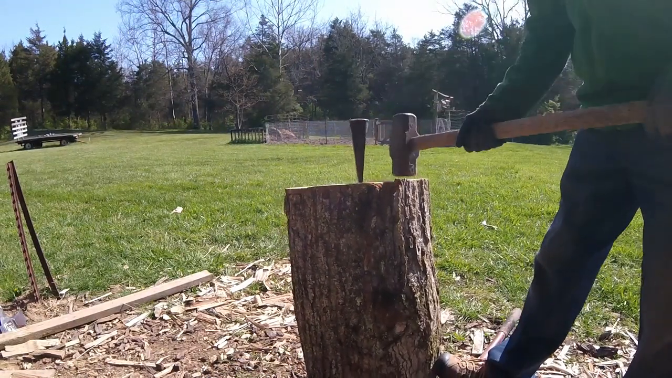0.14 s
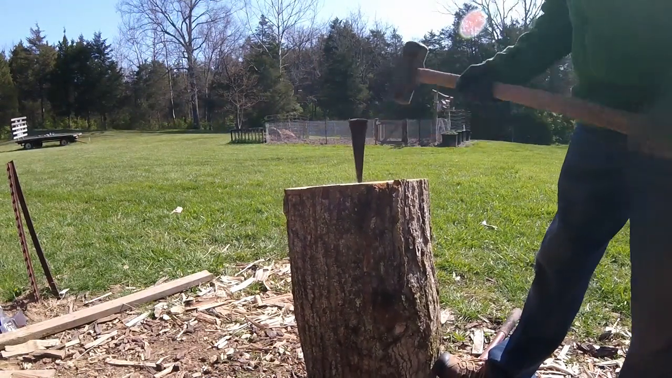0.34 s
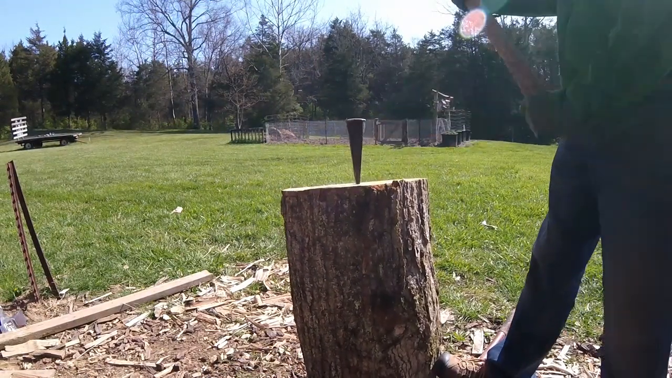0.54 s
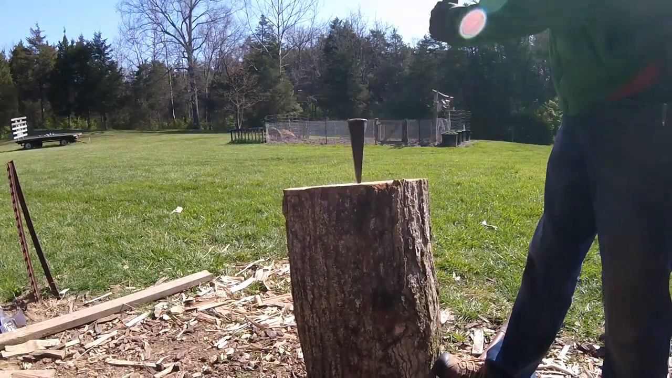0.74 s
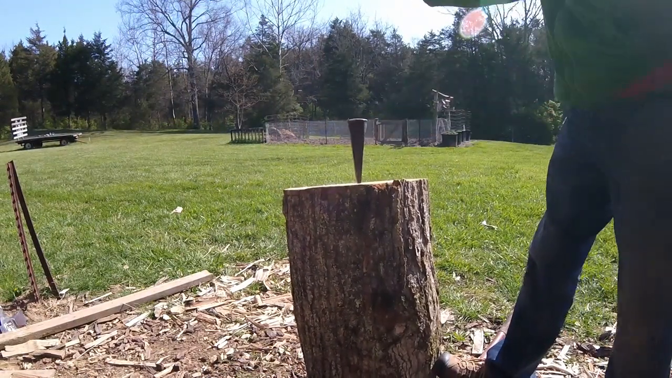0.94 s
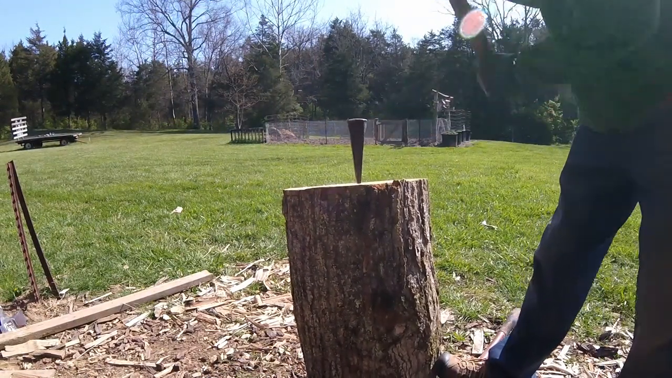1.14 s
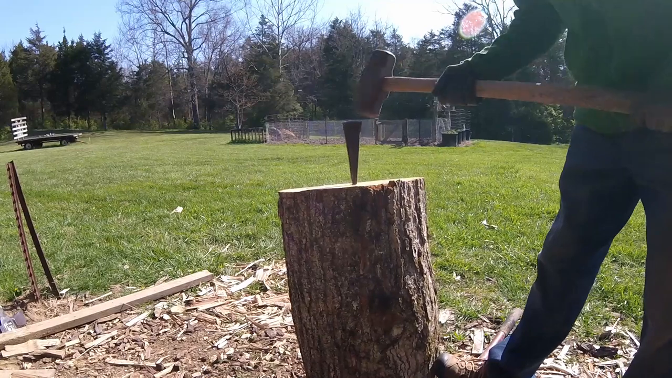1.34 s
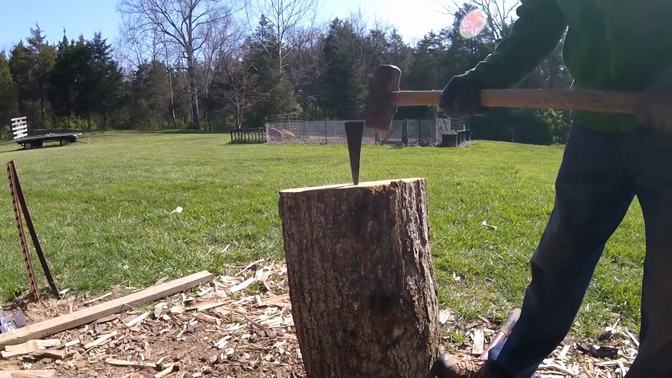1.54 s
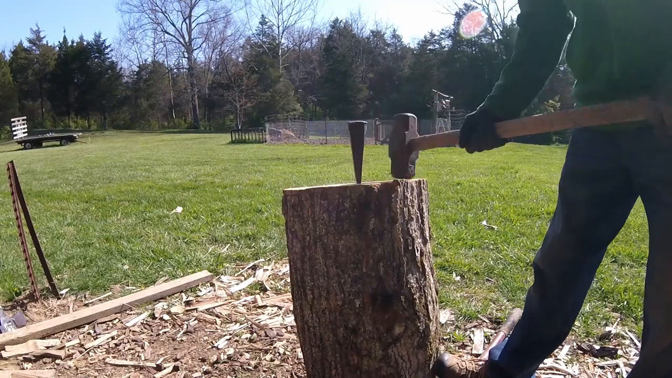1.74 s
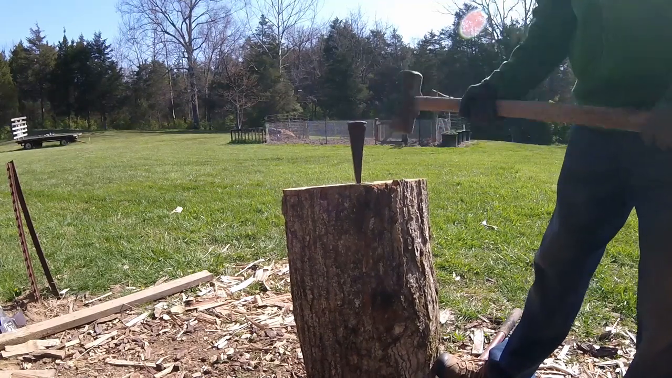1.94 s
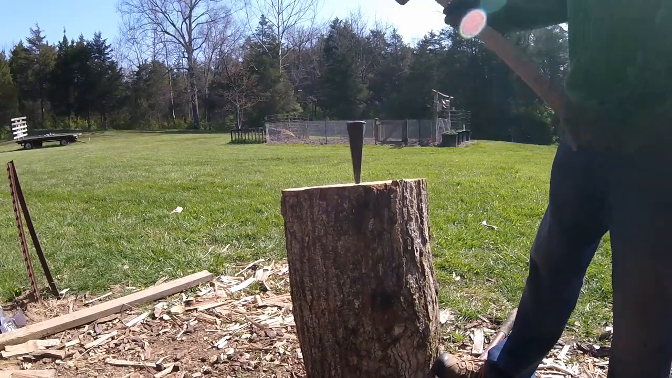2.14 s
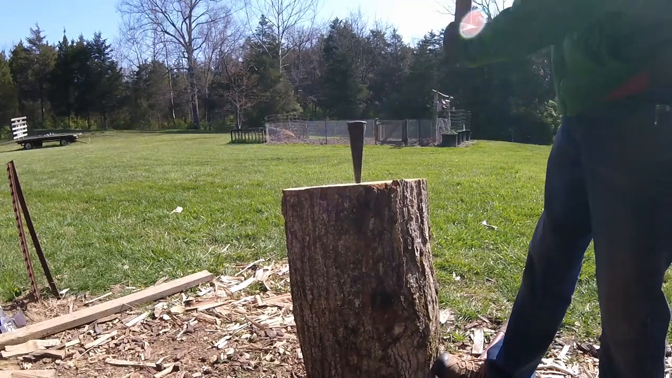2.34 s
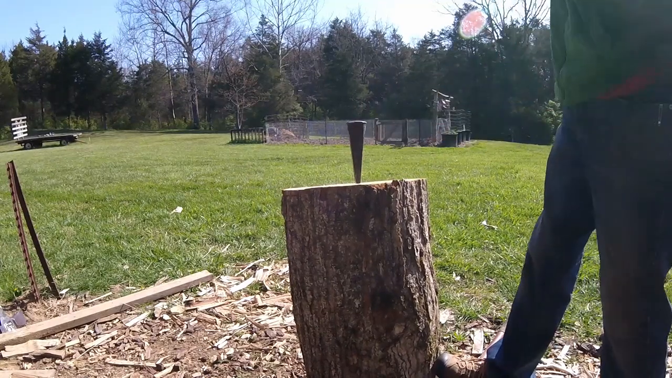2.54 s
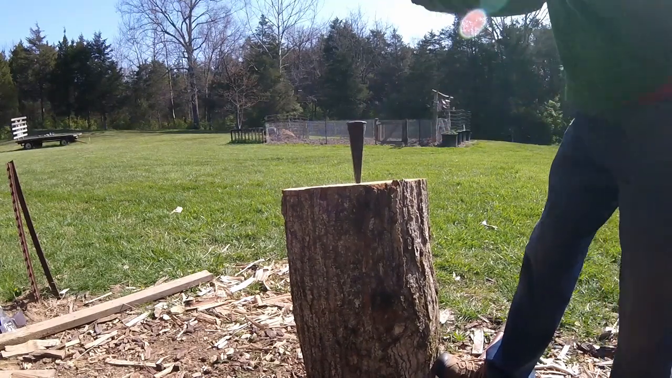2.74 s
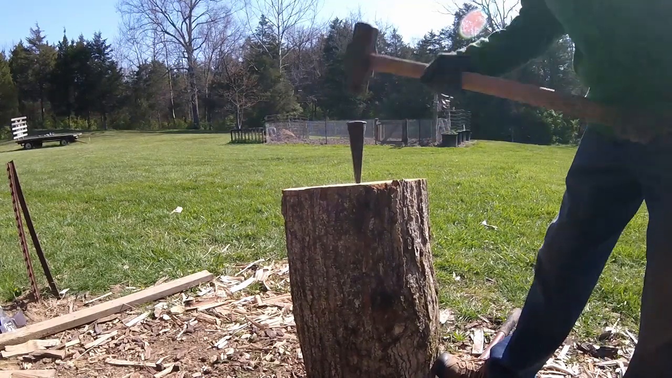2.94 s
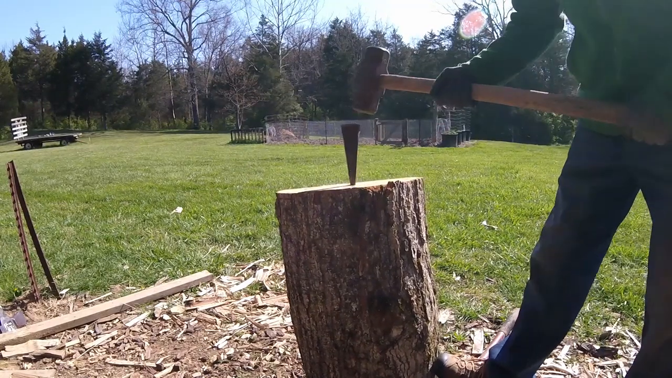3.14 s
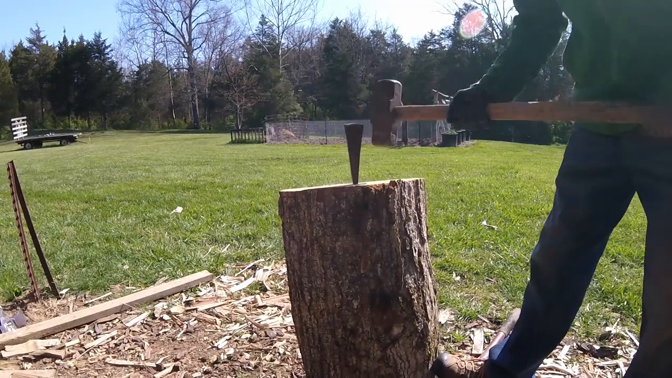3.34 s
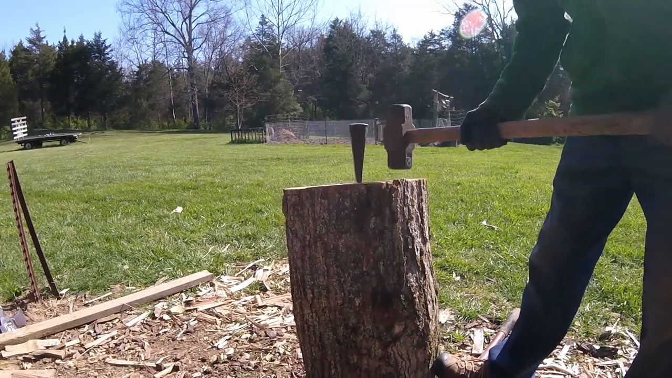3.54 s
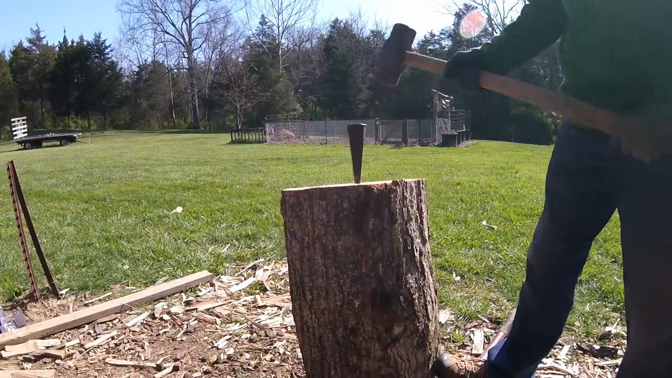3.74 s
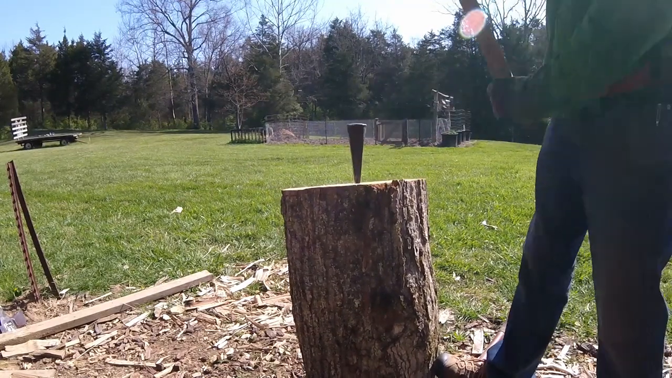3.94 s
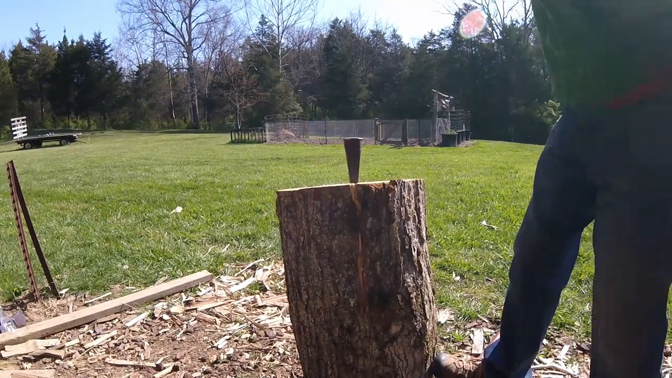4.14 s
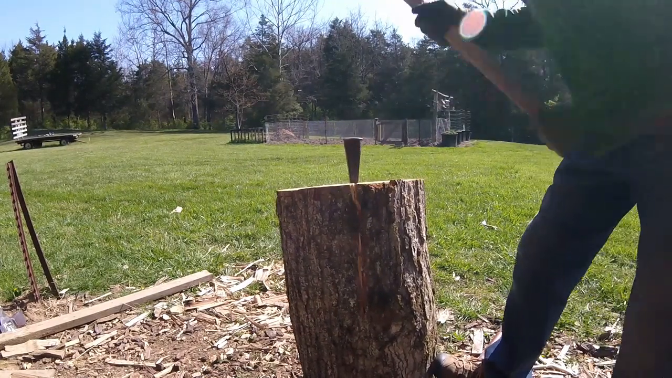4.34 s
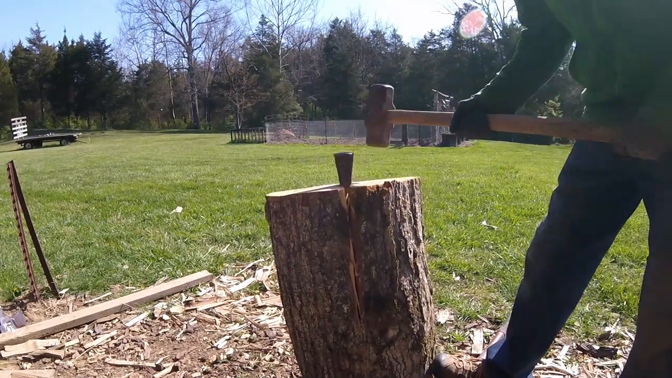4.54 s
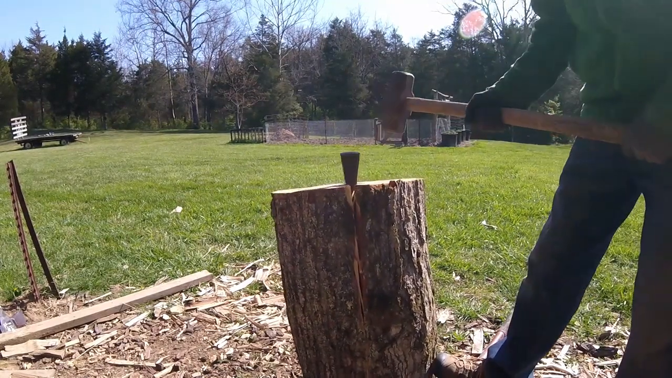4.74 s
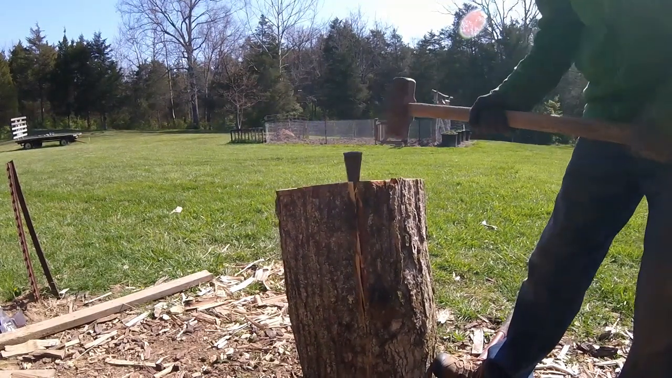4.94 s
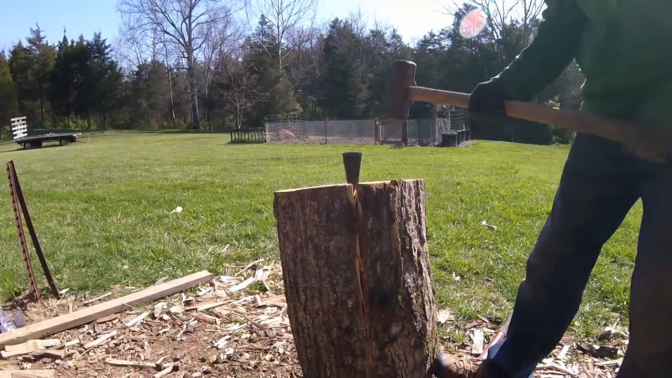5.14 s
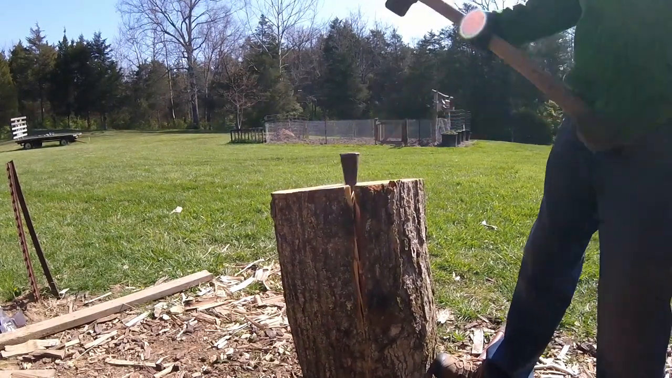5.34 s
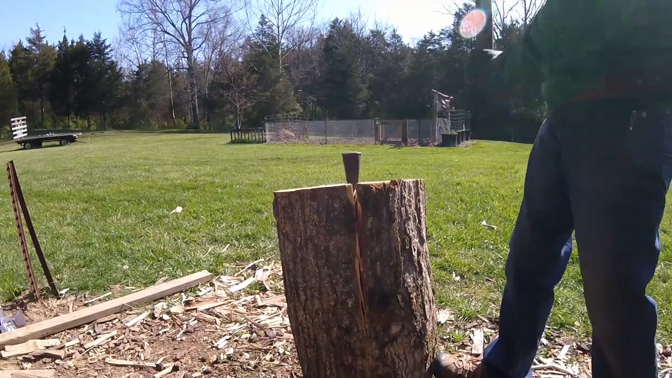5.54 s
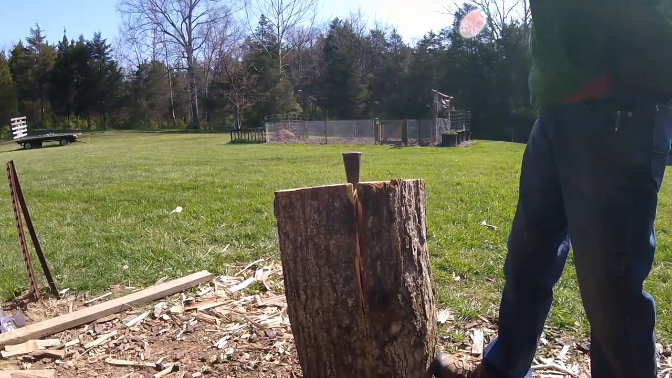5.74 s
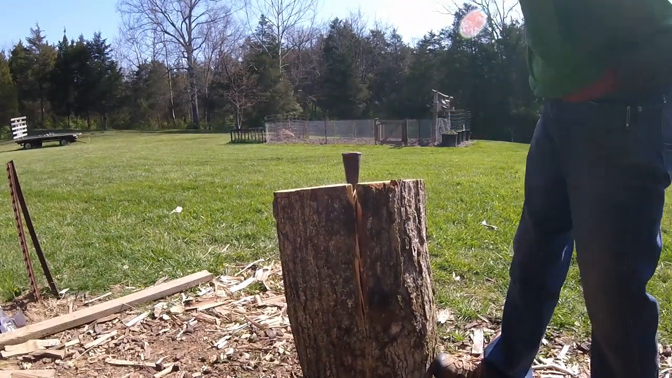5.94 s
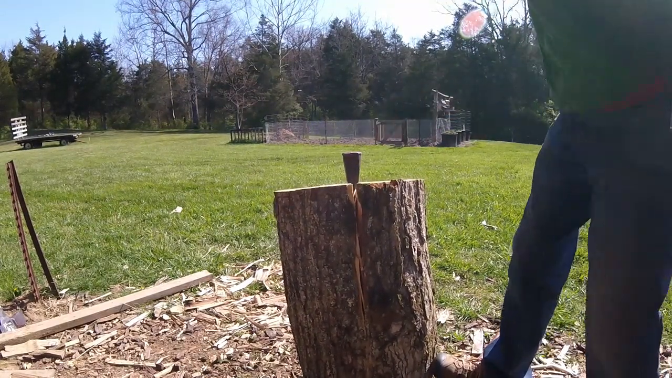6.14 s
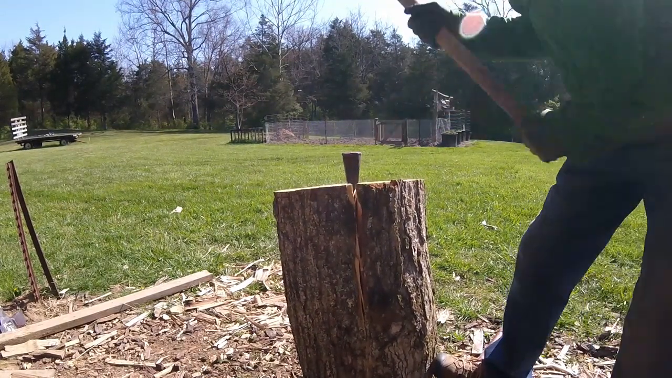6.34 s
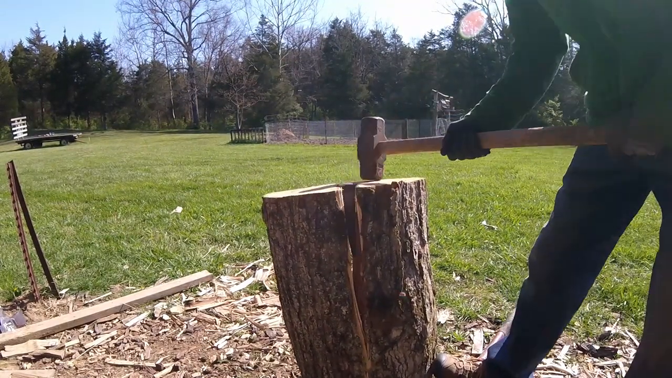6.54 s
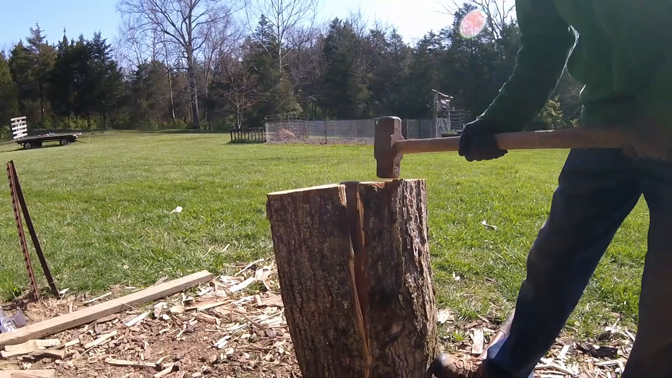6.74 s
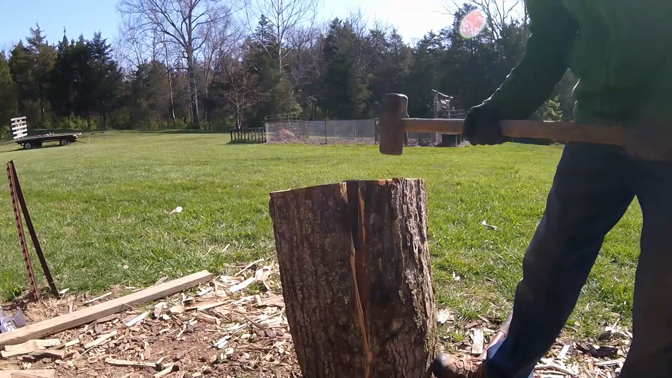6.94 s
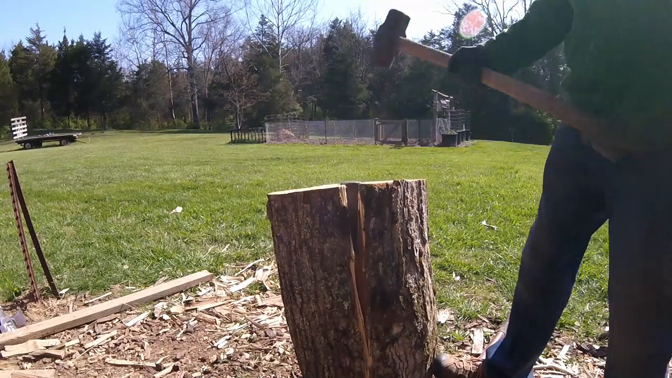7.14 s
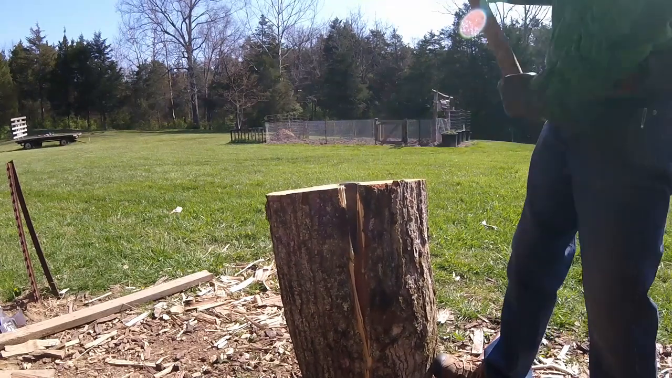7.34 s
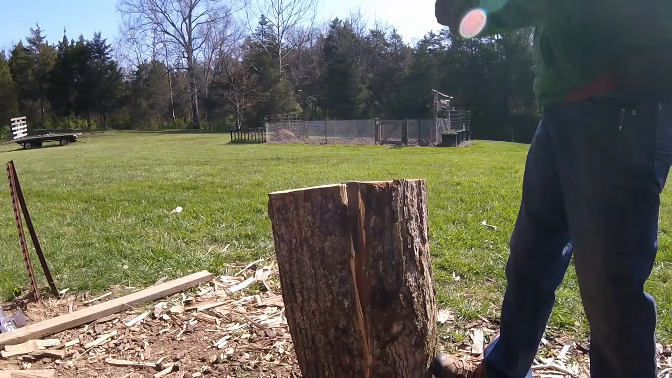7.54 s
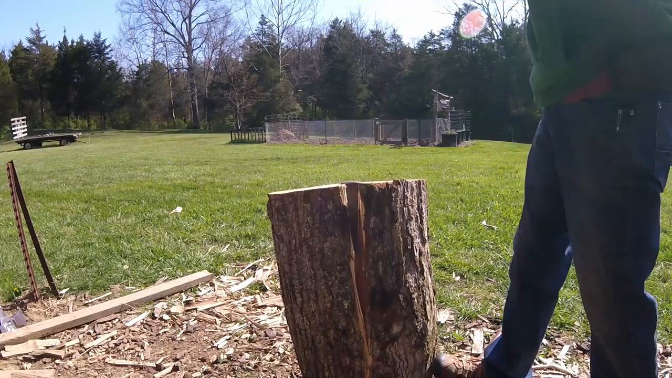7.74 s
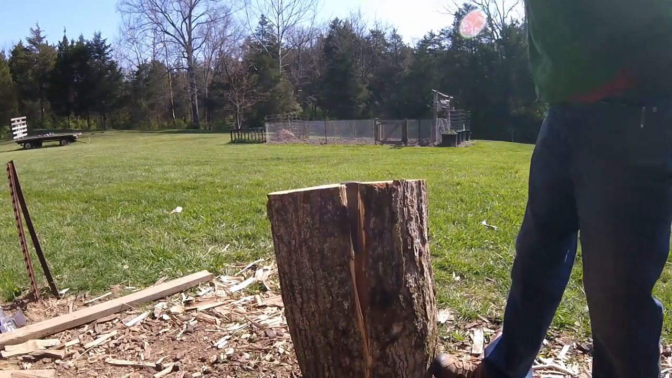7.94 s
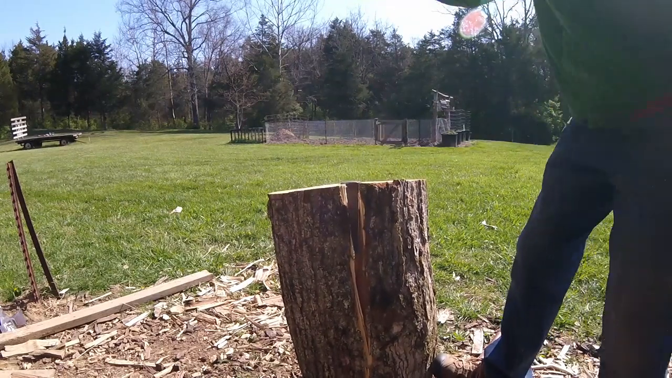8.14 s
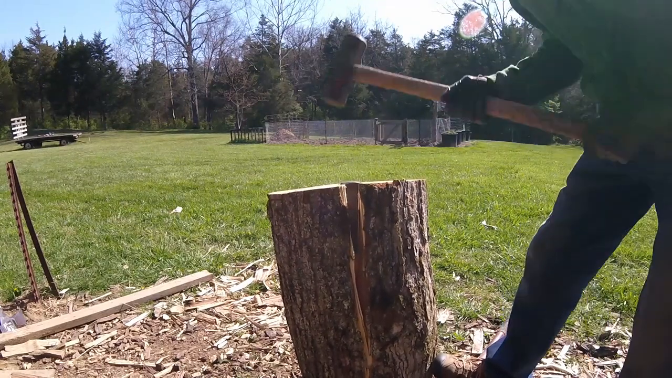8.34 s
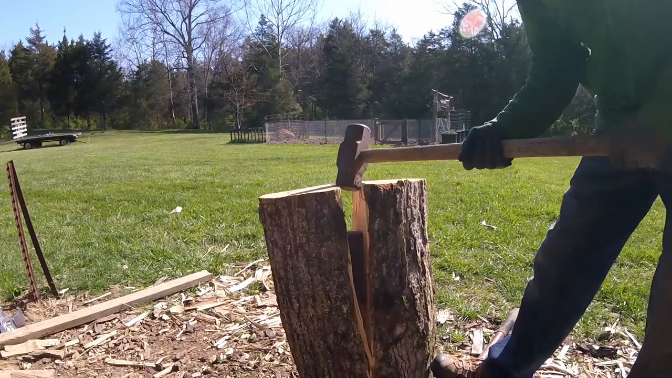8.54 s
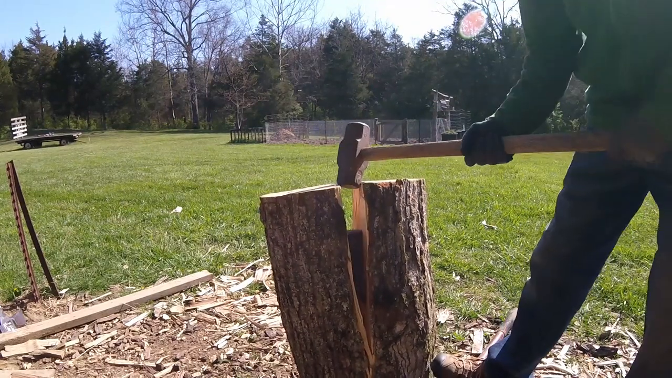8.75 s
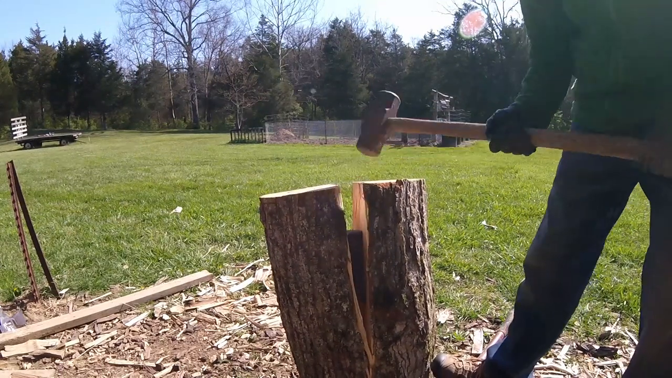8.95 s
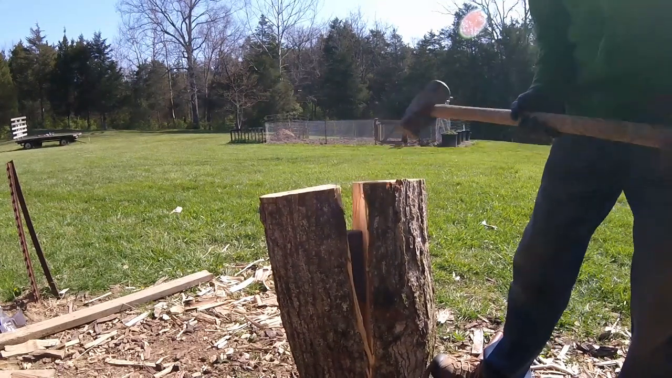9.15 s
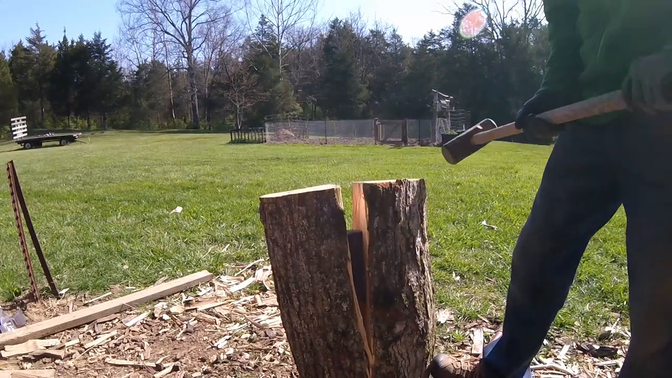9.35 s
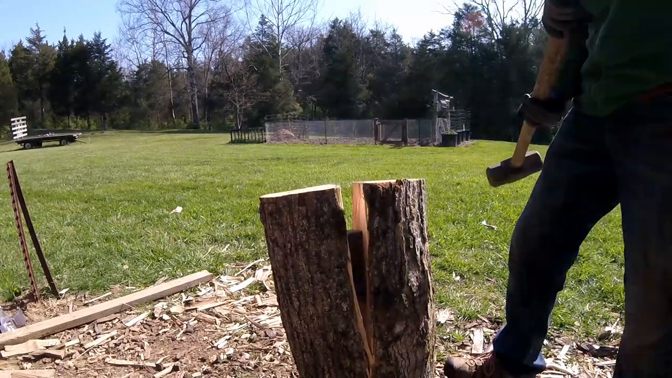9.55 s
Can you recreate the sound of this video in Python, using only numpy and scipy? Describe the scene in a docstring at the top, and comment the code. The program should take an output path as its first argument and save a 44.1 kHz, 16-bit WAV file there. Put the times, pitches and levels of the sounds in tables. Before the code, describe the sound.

Close by in a quiet yard, a heavy hammer knocks lightly on a log, then clanks twice against a steel wedge. Three more blows ring out as the wedge sinks and the wood rips, with small clicks and ticks in the pauses. The last strike splits the log and leaves the loosened wedge ringing briefly. Behind it are a soft rumble of open air and two very faint, distant bird notes.

```python
"""A sledgehammer drives a steel wedge into a log on a quiet lawn, five blows in all.
Each impact excites the modes of steel and wood: the wedge clanks while it stands tall, then rings
as it sinks and the log tears open. Between blows the hammer clicks and is set down; strained fibres tick.
Yard and tree line reflect the sound, over a low rumble of open air and two far bird notes.
A look-ahead limiter lowers the gain just before each blow."""
import sys
import numpy as np
from scipy import signal
from scipy.fft import rfft, irfft
from scipy.io import wavfile
from scipy.ndimage import uniform_filter1d, minimum_filter1d

SR = 44100
rng = np.random.default_rng(int(sys.argv[2]) if len(sys.argv) > 2 else 0)


def log_audio(samples):
    """Write samples as a 16-bit WAV file to the path given in sys.argv[1]."""
    # one column per channel
    frames = np.atleast_2d(samples).T
    # limit to full scale, then quantise
    limited = np.clip(frames, -1, 1)
    pcm = np.round(limited * 32767).astype(np.int16)
    wavfile.write(sys.argv[1], SR, pcm)


N = 426888


def amp(db):
    """Amplitude ratio of a level in decibels."""
    return 10 ** (np.asarray(db) / 20)


def unit(x):
    """Normalisation to rms 1."""
    return x / np.sqrt(np.mean(x ** 2) + 1e-20)


def clock(seconds):
    """Sample times from zero."""
    return np.arange(int(seconds * SR)) / SR


def add(mix, s, sound):
    """Superposition: a sound joins the mix at time s."""
    part = mix[round(s * SR):][:len(sound)]
    part += sound[:len(part)]


def gains(spectrum, size):
    """Frequency response at the FFT bins, interpolated in log frequency."""
    hz, db = np.transpose(spectrum)
    return amp(np.interp(np.log(np.fft.rfftfreq(size, 1 / SR) + 1), np.log(hz), db))


def colour(x, spectrum):
    """Spectral shaping of x, at rms 1."""
    return unit(irfft(rfft(x) * gains(spectrum, len(x)), len(x)))


def noise(size, spectrum):
    """Gaussian noise of a given spectrum, at rms 1."""
    return colour(rng.standard_normal(size), spectrum)


def band_noise(size, hz, octaves):
    """Noise in a bell-shaped band around hz, at rms 1."""
    away = np.log2((np.fft.rfftfreq(size, 1 / SR) + 1) / hz) / octaves
    return unit(irfft(rfft(rng.standard_normal(size)) * np.exp(-.5 * away ** 2), size))


def burst(db, hz, octaves=.6, t60=.015):
    """A damped noise transient; the lower its band, the slower its rise."""
    t = clock(0.3)
    rise = 1 - np.exp(-2 * np.pi * hz * t)
    return amp(db - 60 * t / t60) * rise * band_noise(len(t), hz, octaves)


def ring(modes, t60_scale=1, grind=0):
    """Modal vibration: damped sines of alternating sign, their pitch briefly shaken by grinding."""
    t = clock(.5)
    shake = grind * np.exp(-t / 0.073) * band_noise(len(t), 120, 0.67)
    warped_t = np.cumsum(1 + shake) / SR
    return sum((-1) ** k * amp(db - 60 * t / (t60 * t60_scale)) * np.sin(2 * np.pi * hz * warped_t)
               for k, (hz, db, t60) in enumerate(modes))


# spectrum of the open air (frequency [Hz], relative level [dB])
AIR_SPECTRUM = [(12, -30), (20, 0.5), (43, 1.5), (198, -22.5), (594, -29.5), (1280, -32), (1650, -32),
                (2020, -33), (2410, -34.5), (2600, -33), (3820, -41.5), (4680, -43.5), (5890, -45.5),
                (6520, -41), (8850, -52), (11500, -80.5), (19500, -120)]
def air(rumble_db=-56.8, hiss_db=-83):
    """Ambient noise: a low broadband rumble and a narrow band of hiss."""
    return amp(rumble_db) * noise(N, AIR_SPECTRUM) + amp(hiss_db) * band_noise(N, hz=6550, octaves=.045)


# far notes (time [s], duration [s], start [Hz], end [Hz], level [dB], relative second harmonic [dB])
BIRD_NOTES = [(0.787, 0.133, 2350, 2390, -69.5, -7), (3.65, 0.22, 3540, 3370, -66, -30)]
def bird():
    """Frequency modulation: thin gliding tones that waver a little."""
    out = np.zeros(N)
    for s, length, start_hz, end_hz, db, second_db in BIRD_NOTES:
        t = clock(length)
        hz = np.linspace(start_hz, end_hz, len(t)) * (1 + 0.016 * band_noise(len(t), 60, 1))
        phase = 2 * np.pi * np.cumsum(hz) / SR
        tone = np.sin(phase) + amp(second_db) * np.sin(2 * phase)
        add(out, s, amp(db) * np.sin(np.pi * t / length) * tone)
    return out


# cloth brushing (time [s], duration [s], level [dB], centre [Hz])
CLOTH_BRUSHES = [(7.519, 0.14, -62.5, 2165)]
def sleeves():
    """Friction noise: clothes brush in a soft swell as the hammer is lifted."""
    out = np.zeros(N)
    for s, length, db, hz in CLOTH_BRUSHES:
        t = clock(length)
        add(out, s, amp(db) * np.sin(np.pi * t / length) * band_noise(len(t), hz, octaves=0.58))
    return out


# spectrum of the woods' echo (frequency [Hz], relative level [dB])
WOODS_SPECTRUM = [(200, -19.5), (800, -11.5), (1400, -1), (2000, 1.5), (2600, -1.5), (3500, -3.5),
                  (4400, -7), (5200, -9), (6200, -15.5), (8000, -22), (11000, -46.5)]
def tree_line(x, t60=0.99, rise_s=0.061):
    """Reverberation: the echo from the woods builds, holds a while, then falls ever faster."""
    t = clock(1.5)
    envelope = (1 - np.exp(-(t / rise_s) ** 2)) * amp(-60 * (t / t60) ** 1.5)
    response = noise(len(t), WOODS_SPECTRUM) * envelope
    return signal.fftconvolve(x, response / np.linalg.norm(response))[:N]


def lingering_echo(level_db=-52, t60=0.45):
    """Reverberant decay: at the start the woods still carry the echo of an earlier blow."""
    return noise(N, WOODS_SPECTRUM) * amp(level_db - 60 * np.arange(N) / SR / t60)


# what the yard returns of steel and of wood (frequency [Hz], relative level [dB])
STEEL_RETURN = [(150, -1.5), (600, -1.5), (1500, 3), (3500, -2.5), (6000, -4.5), (8500, -2), (10500, -12.5)]
WOOD_RETURN = [(150, -1), (450, -6.5), (900, 4), (1500, -2.5), (3000, -7.5), (8000, -2)]
def yard(x, scatter, delay_s=0.0021, knee_s=0.029):
    """Early reflections: log, ground and things nearby scatter sound, which dies faster past the knee."""
    t = clock(.5)
    decay_db = -120 * t - 300 * np.maximum(t - knee_s, 0)
    response = noise(len(t), scatter) * (t > delay_s) * amp(decay_db)
    return signal.fftconvolve(x, response / np.linalg.norm(response))[:N]


# spectrum of shaken soil (frequency [Hz], relative level [dB])
SOIL_SPECTRUM = [(15, -10.5), (40, 6.5), (70, -1), (120, -8.5), (200, -19.5), (400, -44), (1500, -79.5)]
def ground(t60=0.56, rock_back_s=0.13, rock_back_db=-10.5):
    """Ground-borne vibration: the soil shudders at each blow, and more weakly as the log rocks back."""
    out, t = np.zeros(N), clock(0.98)
    envelope = amp(-60 * t / t60) * (1 - np.exp(-t / .003))
    for s, *_, db in HAMMER_BLOWS:
        add(out, s, amp(db) * envelope * noise(len(t), SOIL_SPECTRUM))
        add(out, s + rock_back_s, amp(db + rock_back_db) * envelope * noise(len(t), SOIL_SPECTRUM))
    return out


# wooden taps (time [s], level [dB], centre [Hz], width [octaves], t60 [s])
HANDLING_TAPS = [(1.6338, -27.5, 1300, .32, .045), (4.9992, -40, 900, 1.1, .03)]
def taps():
    """Light impacts: handling the hammer gives short, heavily damped transients."""
    out = np.zeros(N)
    for s, db, hz, octaves, t60 in HANDLING_TAPS:
        add(out, s, burst(db, hz, octaves, t60))
    return out


def creep(count=20, mean_wait_s=0.5, floor_db=-63, range_db=11):
    """Stress relaxation: after each tear the wood gives faint ticks that thin out exponentially."""
    out = np.zeros(N)
    for s, _ in LOG_TEARS:
        for wait, size in rng.random((count, 2)):
            add(out, s - mean_wait_s * np.log(1 - wait), burst(floor_db + range_db * size ** 3, hz=4800))
    return out


# sharp clicks (time [s], level [dB], centre [Hz], knock of the log's top [dB])
SHARP_CLICKS = [(3.465, -48.5, 3740, -75), (4.064, -43, 3830, -62), (4.338, -47, 4760, -70),
                (4.624, -35, 4200, -50), (4.9987, -27, 4600, -54), (5.116, -45, 2900, -41.5),
                (5.404, -53.5, 3800, -56), (5.5792, -51, 4370, -72), (5.8405, -50, 4500, -70),
                (5.9815, -52, 3330, -53), (6.134, -53.5, 3780, -52.5), (6.2186, -37.5, 4170, -36.5),
                (6.309, -53.5, 3630, -57), (6.5519, -5, 4480, -28), (6.7312, -45, 4050, -65),
                (7.677, -47, 4200, -60), (7.7943, -53, 3000, -60), (7.8512, -50, 2750, -60),
                (9.1707, -39, 3900, -55), (9.223, -37.5, 3400, -51.5), (9.243, -43, 3990, -62)]
# modes of the log's top (frequency [Hz], relative level [dB], t60 [s])
TOP_MODES = [(1430, -1, .028), (1570, 0, 0.031), (2074, -6.5, .03)]
def clicks():
    """Impulse excitation: fibres snap or the hammer head touches wedge or log, and the log's top rings."""
    out = np.zeros(N)
    for s, db, hz, knock_db in SHARP_CLICKS:
        add(out, s, burst(db, hz))
        add(out, s, amp(knock_db) * ring(TOP_MODES, grind=.05))
    return out


# modes of the log (frequency [Hz], relative level [dB], t60 [s])
LOG_MODES = [(202.3, -11.5, 0.13), (387, -1, 0.018), (530, -2.5, 0.031), (664, -6.5, 0.044),
             (808, -9.5, 0.042), (974, -11, 0.03), (1236, -6, 0.031), (1740, -18, 0.043)]
# spectrum of the dull push into the wood (frequency [Hz], relative level [dB])
PUSH_SPECTRUM = [(60, -11.5), (160, -2), (280, -7.5), (480, -2), (650, 0.5), (900, -7), (1300, -13),
                 (2200, -30), (6000, -55)]
def thud(scuff_db=-5, scuff_t60=0.062):
    """Impulse response of the log: it gives way, rings briefly and scuffs on the ground."""
    t = clock(.5)
    scuff = noise(len(t), PUSH_SPECTRUM) * amp(scuff_db - 60 * t / scuff_t60)
    return ring(LOG_MODES, grind=0.059) + scuff * (1 - np.exp(-t / 0.00025))


# spectrum of the steel contact before tilting (frequency [Hz], relative level [dB])
CONTACT_SPECTRUM = [(100, -11.5), (400, -6), (1500, 7.5), (3000, 6.5), (4800, 1.5), (6500, -9),
                    (8200, -25.5), (9500, -38), (14000, -51.5)]
def crack(t60, tilt_db):
    """Contact transient: a broadband burst, tilted brighter for a square hit than a glancing one."""
    t = clock(.5)
    spectrum = [(hz, db + tilt_db * np.log2(hz)) for hz, db in CONTACT_SPECTRUM]
    return noise(len(t), spectrum) * amp(-60 * t / t60) * (1 - np.exp(-t / .00025))


# hammer set down on the log (time [s], bounce [dB], bounce frequency [Hz], log [dB], tick [dB])
HAMMER_RESTS = [(0.1338, -12, 381, -14, -23.5), (1.8428, -14, 374, -23, -32), (3.5653, -12, 412, -15, -20)]
def knocks():
    """Damped mass on a spring: the head bounces on the end grain for about a cycle, and the log rings."""
    out, t = np.zeros(N), clock(.5)
    for s, bounce_db, bounce_hz, log_db, tick_db in HAMMER_RESTS:
        bounce = amp(bounce_db) * np.sin(2 * np.pi * bounce_hz * t) * np.exp(-t * bounce_hz)
        body = amp(log_db) * thud() * np.exp(-t / 0.053)  # the resting head damps the log
        add(out, s, (bounce - body) * (1 - np.exp(-t / 0.0006)))
        add(out, s + 0.00066, amp(tick_db) * crack(t60=0.021, tilt_db=-4.5))
    return out


# the log tearing open (time [s], level [dB])
LOG_TEARS = [(4.506, -15), (6.513, -5), (8.483, -10.5)]
# spectrum of tearing fibres (frequency [Hz], relative level [dB])
FIBRE_SPECTRUM = [(120, -8.5), (500, 5), (1000, 6), (2000, -27), (3500, 0.5), (5200, -10), (7000, -1.5),
                  (8400, -18.5), (9500, -43), (14000, -56.5)]
def tears(snaps_per_s=2500, t60=0.1):
    """Fracture: fibres break in a dense, decaying train of random impulses."""
    out, t = np.zeros(N), clock(0.99)
    for s, db in LOG_TEARS:
        impulses = (rng.random(len(t)) < snaps_per_s / SR) * rng.choice([-1, 1], len(t))
        add(out, s, amp(db - 60 * t / t60) * colour(impulses, FIBRE_SPECTRUM))
    return out


# modes of the loosened wedge (frequency [Hz], relative level [dB], t60 [s])
FREE_MODES = [(851, -7, 0.082), (6020, -6.5, 0.085), (5965, 0.5, 0.16), (6670, -25, .2), (8050, -21, 0.11),
              (14100, -33, .1)]
def free_ring(db):
    """Free vibration: once the wood lets go, the wedge rings at an almost steady pitch."""
    return amp(db) * ring(FREE_MODES, grind=.001)


# lengthwise modes of the wedge (frequency [Hz], relative level [dB], unscaled t60 [s])
LENGTHWISE_MODES = [(3180, -22, 0.048), (3517, 0.5, 0.091), (3550, -19, .15), (3340, -12, 0.085),
                    (6995, -19.5, 0.056)]
def steel_ring(db, t60_scale, grind):
    """Longitudinal vibration: the steel rings along its length as it grinds into the wood."""
    return amp(db) * ring(LENGTHWISE_MODES, t60_scale, grind)


# slips after a blow (time [s], steel ring [dB], free ring [dB])
WEDGE_SLIPS = [(6.514, 9, -43), (8.498, 11, -39.5), (8.5165, -1.5, -35), (8.548, -22, -19.5)]
def slips(swell_s=0.0098):
    """Stick-slip: the wedge jerks deeper into the split and rings again, with no contact crack."""
    out, swell = np.zeros(N), 1 - np.exp(-clock(.5) / swell_s)
    for s, ring_db, free_db in WEDGE_SLIPS:
        add(out, s, swell * (steel_ring(ring_db, t60_scale=0.9, grind=0.021) + free_ring(free_db)))
    return out


# modes of the hammer head and of the wedge bending (frequency [Hz], relative level [dB], t60 [s])
HEAD_MODES = [(8040, -39, 0.16), (8170, -36, 0.051), (12350, -48.5, .22)]
BENDING_MODES = [(1208, -5, 0.061), (1448, -3.5, 0.05), (1926, -7, 0.027), (2070, -2, 0.025),
                 (2650, -6, 0.011), (3520, -5, .02), (3730, -6, .018), (4210, 0, 0.014), (4550, -1, 0.034),
                 (5380, -3, 0.026), (6260, -5, 0.027)]
# hammer on wedge (time [s], crack [dB], crack tilt [dB/octave], depth sunk [0-1], steel ring [dB],
# log thud [dB], soil shudder [dB])
HAMMER_BLOWS = [(1.3618, 4, 3.5, 0, -24, -11.5, -30), (3.0601, 2, 3, 0.08, -22, -10.5, -31),
                (4.5035, 5.5, 0, 0.4, 10, -5.5, -31.5), (6.5098, 2, 3.5, .85, 8, 1, -31.5),
                (8.4814, 0, 3.1, 0.95, 4.5, -9, -27.5)]
def blows(clank_db=1.5, sunk_db=-20, give_s=.003, free_depth=.9):
    """Impact excitation: each blow sounds head, wedge and log; wood mutes the bending as the wedge sinks."""
    out, t = np.zeros(N), clock(.5)
    contact, swell = 1 - np.exp(-t / 0.0012), 1 - np.exp(-t / 0.0017)  # the modes take time to build up
    for s, crack_db, tilt_db, depth, ring_db, thud_db, _ in HAMMER_BLOWS:
        add(out, s, amp(crack_db) * (crack(t60=0.025, tilt_db=tilt_db) + swell * ring(HEAD_MODES)))
        add(out, s, contact * amp(clank_db + sunk_db * depth) * ring(BENDING_MODES, grind=0.029))
        add(out, s, swell * steel_ring(ring_db, t60_scale=0.6, grind=0.024))
        add(out, s + give_s * depth, contact * amp(thud_db) * thud())  # deeper, the log gives way later
        if depth > free_depth:  # the split has opened
            add(out, s, swell * free_ring(db=-2.5))
    return out


def scene(steel_wet_db=-13.5, knock_wet_db=-8, tick_wet_db=-12, woods_db=-45):
    """Superposition of direct sound, near and far reflections, and the background."""
    strikes, rests = blows() + slips() + tears(), knocks()
    lowpass = signal.butter(6, 7600, fs=SR, output="sos")
    ticks = signal.sosfilt(lowpass, clicks() + creep() + taps())
    near = yard(amp(steel_wet_db) * strikes + amp(tick_wet_db) * ticks, STEEL_RETURN)
    near += amp(knock_wet_db) * yard(rests, WOOD_RETURN)
    far = amp(woods_db) * tree_line(strikes + rests) + lingering_echo()
    return (strikes + rests + ticks + near + far + ground() + sleeves() + bird() + air())[None]


def recover(cut_db, db_per_s):
    """Peak hold with linear release: each gain cut is let go at a steady rate."""
    fall = np.arange(N) * db_per_s / SR
    return np.maximum.accumulate(cut_db + fall) - fall


# treble roll-off of the microphone (frequency [Hz], gain [dB])
MIC_RESPONSE = [(8000, -1), (9500, -3), (11000, -13.5), (14000, -19)]
def record(dry, ceiling_db=-12, fast_db_per_s=85, slow_db_per_s=4.5, slow_share=0.48, edge_hz=14400):
    """Look-ahead limiting with a two-stage release, between microphone roll-off and a band limit."""
    x = irfft(rfft(dry[0]) * gains(MIC_RESPONSE, N), N)
    power_db = 10 * np.log10(abs(uniform_filter1d(x ** 2, size=130)) + 1e-12)
    ahead = 1852  # samples, 42 ms
    over_db = -minimum_filter1d(np.minimum(ceiling_db - power_db, 0), ahead, origin=-(ahead // 2))
    # the slow stage starts 6 dB down and lets the background swell back between blows
    slow_db = np.r_[6, slow_share * over_db[1:]]
    cut_db = np.maximum(recover(over_db, fast_db_per_s), recover(slow_db, slow_db_per_s))
    limited = x * amp(-uniform_filter1d(cut_db, size=64))
    band_limit = signal.firwin(511, edge_hz, window=("kaiser", 9), fs=SR)
    return signal.oaconvolve(limited, band_limit, "same")[None]


dry = scene()
out = record(dry)
log_audio(out)
```